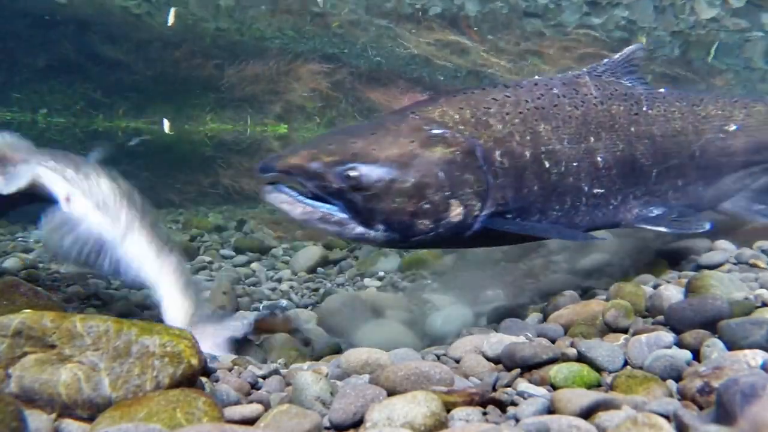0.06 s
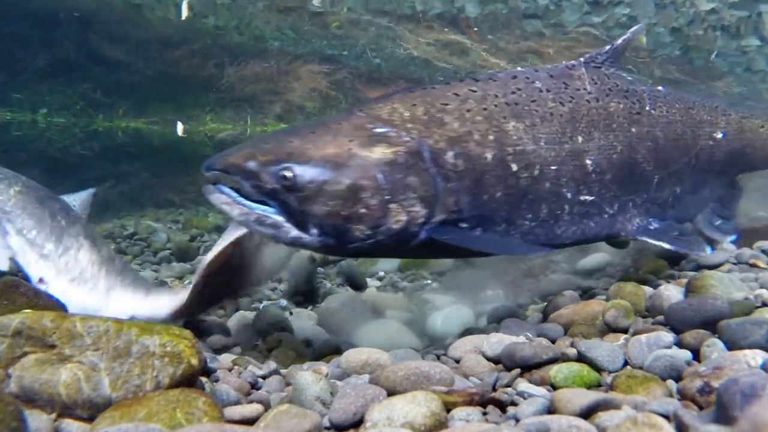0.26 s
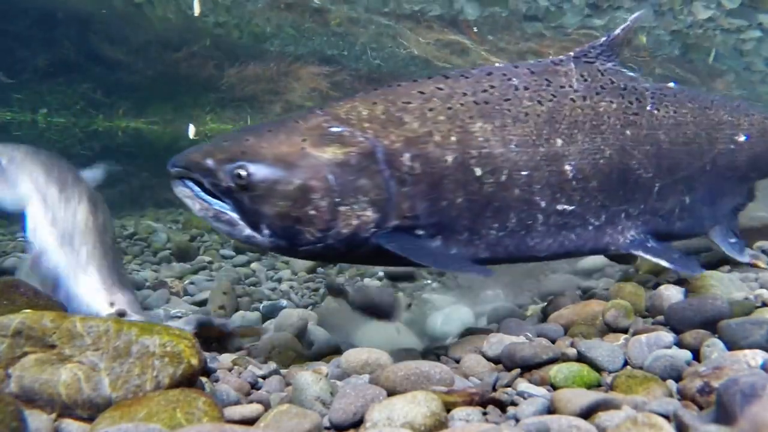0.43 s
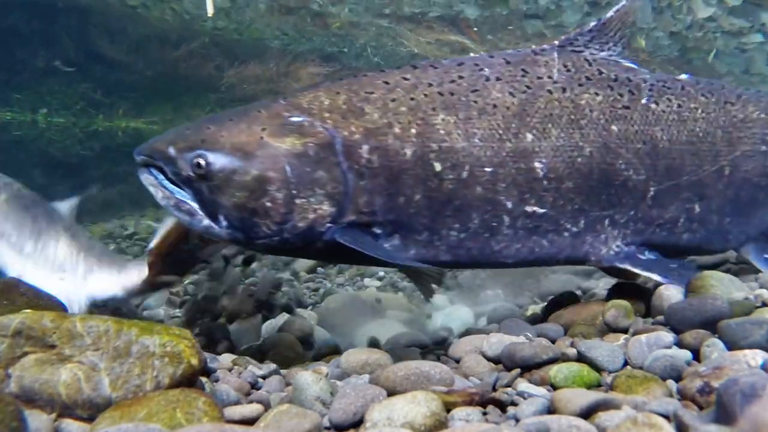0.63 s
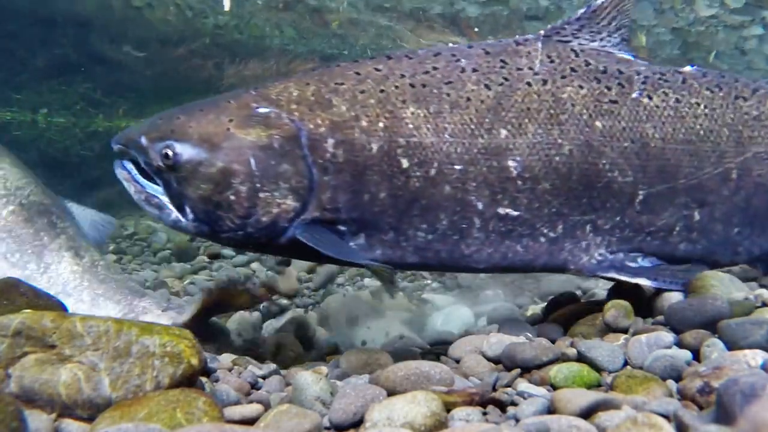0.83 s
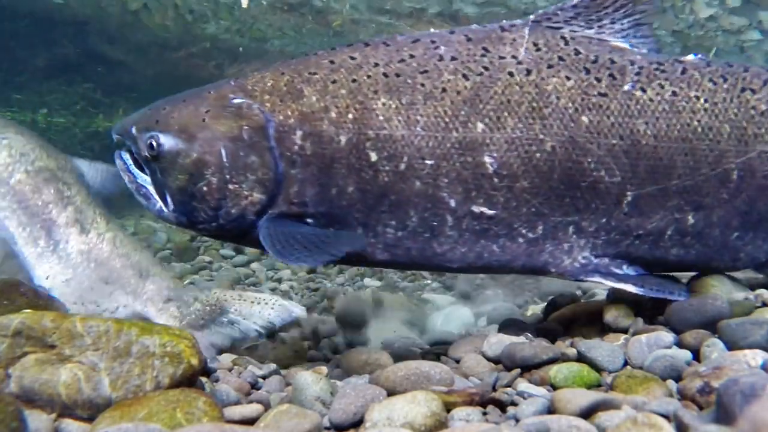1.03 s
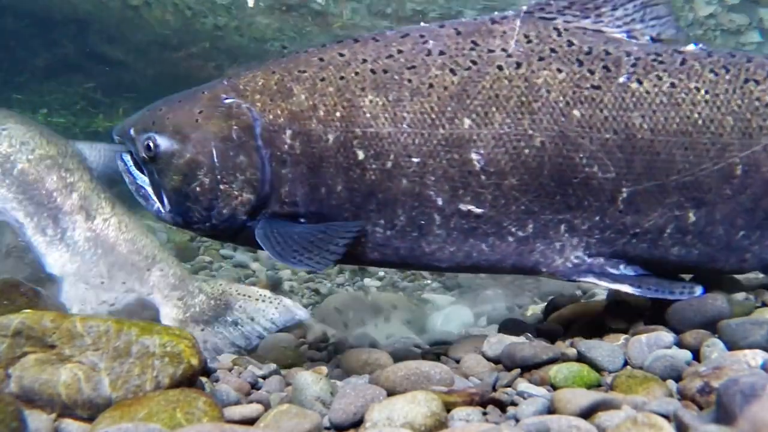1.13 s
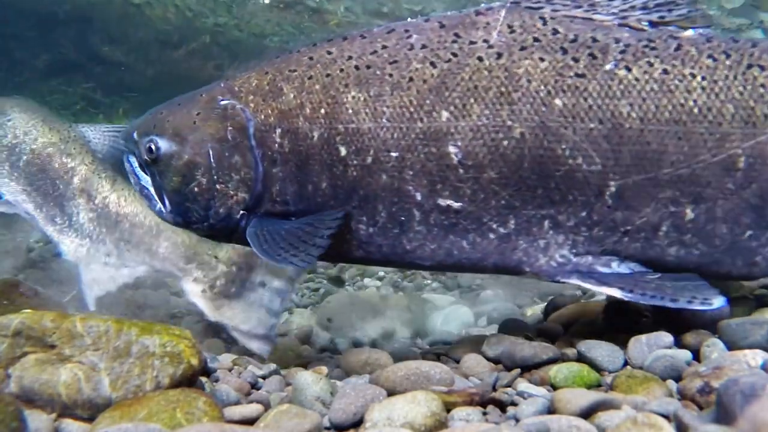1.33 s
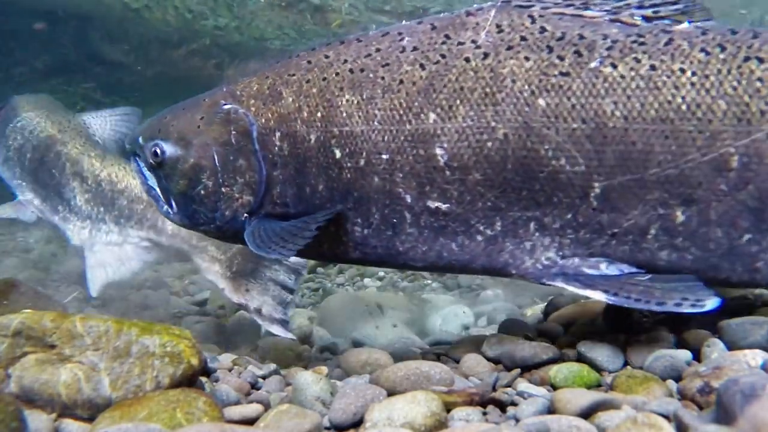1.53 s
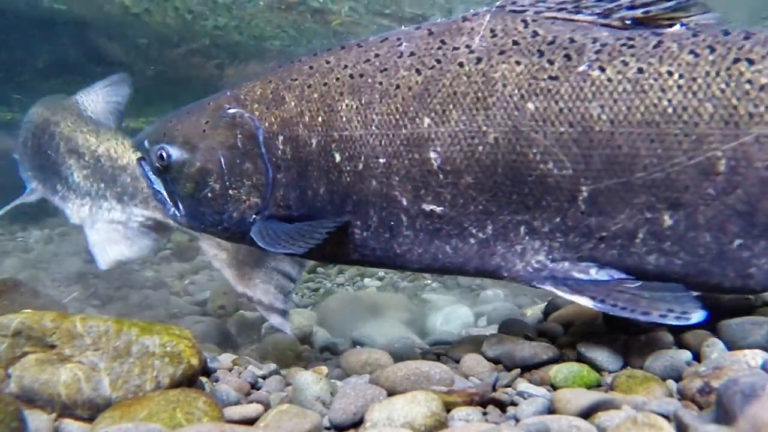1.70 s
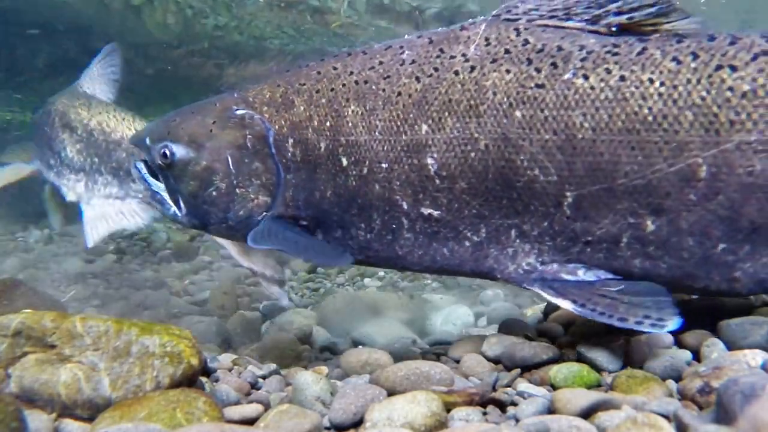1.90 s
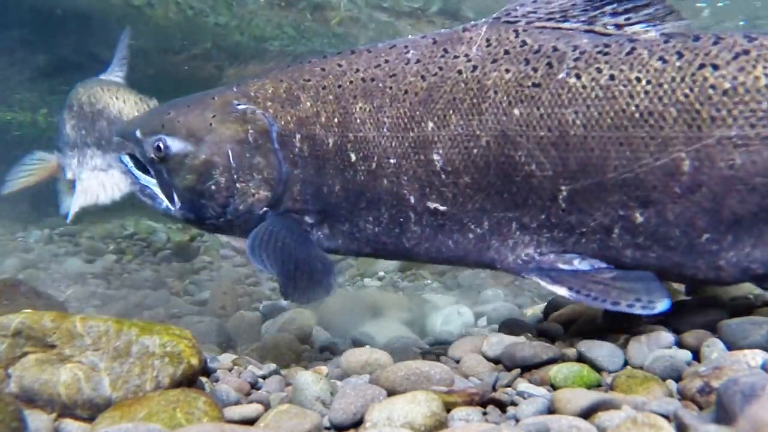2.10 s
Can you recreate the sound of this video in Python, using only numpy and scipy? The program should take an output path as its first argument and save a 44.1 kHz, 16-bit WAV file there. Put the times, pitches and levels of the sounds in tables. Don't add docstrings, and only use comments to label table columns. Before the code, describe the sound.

Stones knock and rattle on a riverbed underwater as a fish beats its tail

```python
import sys
import numpy as np
from scipy import signal
from scipy.fft import rfft, irfft, next_fast_len
from scipy.io import wavfile
from scipy.ndimage import uniform_filter1d, map_coordinates

SR = 44100
rng = np.random.default_rng(int(sys.argv[2]) if len(sys.argv) > 2 else 0)


def output_pcm(signal):
    pcm = np.clip(np.atleast_2d(signal).T, -1, 1) * 32767
    wavfile.write(sys.argv[1], SR, np.round(pcm).astype(np.int16))


def makeup_ratio(level_db):
    decades = np.asarray(level_db, float) / 20
    return 10 ** decades


N = 94815
CHATTER_HZ = 860


def unit(x):
    return x / np.sqrt(np.mean(x ** 2) + 1e-20)


def curve(rows):
    s, *columns = np.transpose(rows)
    return [np.interp(np.arange(N) / SR, s, column) for column in columns]


def wobble(rate):
    knots = rng.standard_normal(400)
    return map_coordinates(knots, [np.arange(N) * rate / SR])


def filtered(x, response):
    m = next_fast_len(N + 8192)
    return irfft(rfft(x, m) * response(np.fft.rfftfreq(m, 1 / SR)), m)[:N]


def noise(spectrum):
    f, db = np.transpose(spectrum)

    def colour(hz):
        return makeup_ratio(np.interp(np.log(hz + 1), np.log(f + 1), db))

    return unit(filtered(rng.standard_normal(N), colour))


def water():
    # (time [s], level [dB])
    shove = [(0, -52.5), (.15, -39.5), (.27, -42.5), (.45, -39), (.55, -43), (.65, -31), (.78, -41.5),
             (.88, -42), (1.1, -40.5), (1.3, -41), (1.55, -47.5), (2.15, -51.5)]
    # (frequency [Hz], density [dB per Hz])
    rumble_spectrum = [(12, -46), (22, -7), (60, 4), (100, 5), (240, -14), (450, -17.5), (880, -120)]
    # (frequency [Hz], density [dB per Hz])
    hiss_spectrum = [(88, -31), (150, 2), (450, -1.5), (1180, -7), (2580, -9.5), (4470, -16),
                     (14500, -24.5), (16300, -38)]
    rumble = unit(noise(rumble_spectrum) * makeup_ratio(1.4 * wobble(8.76)))
    hiss_db = -50.5 + 1.8 * wobble(5.83)
    hiss = noise(hiss_spectrum) * makeup_ratio(hiss_db)
    return makeup_ratio(curve(shove)[0] - 0.07) * rumble + hiss


def housing(f):
    # (centre [Hz], width [Hz], level [dB])
    resonances = [(567, 210, -11.5), (1031, 94, -8), (1648, 287, -4), (1894, 307, 0.5), (2514, 760, 3),
                  (4056, 610, -2), (4933, 536, 0), (6400, 510, 1), (7056, 320, 2), (9670, 1740, -8),
                  (11600, 2400, -11.5), (13900, 2500, -12)]
    leak_db, leak_hz = -14.5, 297
    rings = 0
    for k, (centre, width, db) in enumerate(resonances):
        damping = 1j * f * width
        rings = rings + (-1) ** k * makeup_ratio(db) * damping / (centre * centre - f * f + damping)
    return rings + makeup_ratio(leak_db) / (1 + 1j * f / leak_hz)


def hardness(f, bright_db, body_db):
    knee_hz, bright_octaves, body_hz = 2680, 1.9, 2110
    high = np.clip(np.log2(f / knee_hz + 1e-9) / bright_octaves, 0, 2)
    low = np.clip(np.log2(body_hz / (f + 1)), 0, 1) * np.clip(f / CHATTER_HZ, 0, 1)
    return makeup_ratio(bright_db * high + body_db * low)


def causal(gain):
    c = irfft(np.log(gain))
    half = c.shape[1] // 2
    return np.exp(rfft(np.hstack([c[:, :1], 2 * c[:, 1:half], 0 * c[:, half:]])))


def contacts(s, level_db, bright_db, body_db):
    length, lead = 2048, 256
    blow_t60_s, attack_s = 0.0029, 0.00014
    bed_db, bed_t60_s = -13.5, 0.027
    swell_db, swell_t60_s = -22, 0.0046
    impact_db, impact_hz, impact_lag = 11, 5900, 12
    rough_per_db = 0.07
    own_colour_db = 2

    t = (np.arange(length) - lead) / SR
    f = np.fft.rfftfreq(length, 1 / SR)
    after = np.maximum(t, 0)
    decay = makeup_ratio(-60 * after / blow_t60_s) + makeup_ratio(bed_db - 60 * after / bed_t60_s)
    swell = makeup_ratio(swell_db - 60 * abs(t) / swell_t60_s)
    shape = decay * (1 - np.exp(-after / attack_s)) + swell

    roughness = makeup_ratio(rough_per_db * np.clip(bright_db, -30, 5))[:, None]
    chatter = rfft(rng.standard_normal((len(s), length)) * shape * roughness)
    chatter = chatter * 1j * f / (CHATTER_HZ + 1j * f)
    delay = np.exp(-2j * np.pi * f * (lead + impact_lag) / SR)
    impact = makeup_ratio(impact_db) * delay / (1 + 1j * f / impact_hz) ** 2

    tint = rng.standard_normal((len(s), len(f)))
    own_db = own_colour_db * unit(uniform_filter1d(tint, size=36, axis=1))
    stone = causal(hardness(f, bright_db[:, None], body_db[:, None]) * makeup_ratio(own_db))
    heard = irfft((chatter + impact) * stone * housing(f), length)
    power = np.mean(heard[:, lead:][:, :64] ** 2, axis=1)
    heard *= (makeup_ratio(level_db) / np.sqrt(2 * power))[:, None]
    where = np.round(s * SR).astype(int)[:, None] + np.arange(length)
    return np.bincount(where.ravel(), heard.ravel(), N + length)[lead:][:N]


def grit():
    # (time [s], grit level [dB], fineness [dB])
    stir = [(0, -49.5, -18), (.12, -49.5, -30), (.14, -42, -9.5), (.3, -43.5, -0.5), (.42, -38, -1),
            (.53, -44.5, -9), (.6, -31, -5), (.72, -34.5, -1), (.8, -37, -3.5), (.99, -40, 4),
            (1.08, -42.5, -21), (1.14, -42.5, 8), (1.22, -40.5, -16), (1.45, -43, 4), (1.6, -51.5, 1),
            (1.67, -43, 3), (1.8, -55, 3), (2.15, -57.5, 12)]
    clicks_per_s, click_db, spread_db = 600, 3, 6.5
    click_bright_db, varies_db = 1, 9
    sand_db, sand_patchy_db, sand_bright_db = -8.5, 4, 5.5

    stir_db, fine_db = curve(stir)
    gap, size, hard = rng.random((3000, 3)).T
    s = np.cumsum(-np.log(1 - gap)) / clicks_per_s
    keep = s < N / SR
    s = s[keep]
    level_db = click_db + spread_db * (np.minimum(-np.log(1 - size[keep]), 2.2) - 1)
    bright_db = click_bright_db + varies_db * (2 * hard[keep] - 1)
    bright_db = bright_db + fine_db[(s * SR).astype(int)]
    clicks = contacts(s, level_db, bright_db, 0 * bright_db)

    fizz = rng.standard_normal(N) * makeup_ratio(sand_patchy_db * wobble(90))
    sand = unit(filtered(fizz, lambda f: housing(f) * hardness(f, sand_bright_db, 0)))
    return makeup_ratio(stir_db) * (clicks + makeup_ratio(sand_db) * sand)


def stones():
    # (time [s], level [dB], brightness [dB], body [dB])
    stone_knocks = [(0.0781,-17,5,-9),(0.0943,-19.5,-1,1),(.1336,-25,8,15),(.1895,-19.5,-35,0),(0.2036,-23.5,-34,8),(0.2112,-11.5,-41,-2.5),(.249,-21.5,21,-5),(.2611,-23,-31,-2.5),(0.272,-27,5,6),(0.3293,-27,10,0),(0.3453,-6.5,-64,3.5),(0.3703,-14,-4,-1),(0.3739,-1.5,-24.5,-12),(.4056,-6,-7,-8),(0.4241,-17,-25,0),(0.4442,-12,-13,-2),(.4528,-9,-29,-5),(.4544,-14.5,-23,-16),(0.4689,-18.5,-30,0.5),(0.5792,-10.5,-13,1),(0.59,-15.5,3,5.5),(0.609,1,1,6),(0.6213,-9.5,10,0),(0.6336,-17,9,14),(.6594,-16.5,-4,7),
                    (0.6622,-20,-18,3),(.6675,-1.5,0,-1),(.682,-11.5,3,10),(0.6952,-14,4,3),(0.7062,-5.5,10.5,-3),(.7098,-5.5,13.5,3),(0.7583,-23,4,-4),(0.7707,-10,2,3),(0.7799,-19,22,6),(0.8315,-20,13,15),(0.8608,-16.5,6,6),(0.901,-24.5,8,4),(0.9138,-9,6,5.5),(.955,-5.5,-0.5,-3),(0.9584,-13,7,2),(0.9647,-16.5,1,1),(0.9827,-12.5,9,-1),(1.008,-9.5,6.5,-5),(1.0107,-9,2,0),(1.0157,-11.5,9,0),(1.0296,-9.5,4,3),(1.0371,-9,3,1),(1.042,-15,0,-12),(1.0606,-14.5,7,-2),(1.074,-13,3,4),
                    (1.0803,-1,-3.5,1.5),(1.1001,-11,-7.5,10.5),(1.1196,-15,12,6),(1.1673,-18.5,5,-2),(1.1864,-23,8,4),(1.1934,-17,-4,8),(1.2015,-8,-16,-0.5),(1.2066,-16.5,4,5),(1.2174,-20,14,3),(1.222,-16.5,23,4),(1.2351,-6,-5.5,2.5),(1.2623,-19,6,11),(1.2885,-18.5,3,8),(1.2948,-20,18,2),(1.3264,-10,-8,1),(1.3502,-17.5,14,4),(1.3741,-14,-9,0.5),(1.3872,-21,5,9),(1.4011,-16.5,-9,1),(1.4224,-11.5,3.5,0.5),(1.4361,-12,7,-3),(1.4415,-33,-3,0),(1.449,-15.5,-2,6),(1.465,-21.5,3,-4),(1.48,-17,-1,-5),
                    (1.4882,-15,7,4),(1.5051,-22,12,0),(1.536,-20,10,6),(1.5539,-20,7,0),(1.573,-18.5,6.5,-6),(1.5945,-20,13,-3),(1.5981,-16,6,-5),(1.6313,-21,13,-3),(1.6417,-8.5,-3.5,-7.5),(1.65,-28,5,-2),(1.6895,-15,6.5,4),(1.7243,-30,20,-2),(1.7366,-28.5,21,2),(1.7641,-20.5,10,8),(1.7798,-23.5,5,-2),(1.8357,-25,17,-7),(1.8515,-30,0,-5),(1.879,-29.5,-7,3),(1.899,-24.5,7.5,-6),(1.9112,-27.5,6,-8),(1.9409,-22.5,9,-4),(1.9912,-27,13.5,-1),(2.0227,-28.5,22,-2),(2.0433,-30.5,-3,3),(2.06,-28,27,0),
                    (0.0287,-36,10,0),(0.1648,-41,16,0),(0.2988,-22,-29,11.5),(0.4,-20,-18,6),(0.4137,-17.5,-2,9),(0.4879,-28,-16,11),(0.52,-29,15,-2),(0.5405,-36,12,-2),(0.5538,-28,8,-3),(0.5751,-19,2,3),(.647,-22,17,9),(0.7132,-16.5,10,0),(0.7157,-18,-5,4),(0.731,-25,2,3),(0.8253,-23.5,-5,8),(.85,-21.5,8,-4),(0.889,-25,16,-6),(0.945,-23.5,1,7),(1.023,-27,8,0),(1.109,-22,4,4),(1.1152,-17,-4,2),(1.135,-29,5,0),(1.15,-25,15,0),(1.1622,-22,5,0),(1.6765,-22.5,10,5),(1.799,-35,8,-8),(1.92,-27,4,-2),(2.1007,-43,-4,-0.5),(2.1215,-32.5,6,1),(2.127,-34,12,-6)]
    knocks = np.array(stone_knocks)
    s, level_db, bright_db, body_db = knocks.T
    return contacts(s, level_db - 2.5, bright_db, body_db)


def bubbles():
    # (time [s], pitch [Hz], level [dB], decay T60 [s], onset [s])
    pockets = [(1.193, 1860, -13, 0.018, 0.00082), (1.202, 1656, -28, 0.088, 0.0024),
               (1.285, 515, -19, 0.025, 0.00088), (1.271, 659, -19, 0.27, 0.0087),
               (1.275, 1320, -33, 0.058, 0.0013), (1.284, 706, -15, 0.1, 0.0063),
               (1.325, 624, -21, 0.16, 0.0017), (1.338, 1270, -27, 0.04, 0.0018),
               (1.372, 609, -21.5, 0.1, 0.0026), (1.375, 826, -32, 0.093, 0.004),
               (1.398, 860, -32.5, 0.14, 0.0079), (1.408, 625, -33, 0.11, 0.0018),
               (1.482, 623, -23, .19, 0.0017), (1.482, 1592, -16, 0.062, 0.0022),
               (1.482, 1645, -21, 0.056, 0.0022)]
    rise_per_s, waver, flutter_db = 0.31, 0.0098, 2
    out = np.zeros(N)
    for s, hz, db, t60, onset in pockets:
        t = np.maximum(np.arange(N) / SR - s, 0)
        pitch = hz * (1 + rise_per_s * t + waver * wobble(40.1)) * (t > 0)
        phase = 2 * np.pi * np.cumsum(pitch) / SR
        level = makeup_ratio(db - 60 * t / t60 + flutter_db * wobble(69.88))
        out += level * (1 - np.exp(-t / onset)) * np.sin(phase)
    return out


def scene():
    return (water() + grit() + stones() + bubbles())[None]


def roll_off(x):
    return signal.sosfilt(signal.butter(12, 16510, fs=SR, output="sos"), x)


def record(dry):
    top_hz, top_db_per_khz = 15200, 30

    def band_limit(hz):
        return makeup_ratio(-top_db_per_khz * np.maximum(hz - top_hz, 0) / 1000)

    x = filtered(np.clip(dry[0], -1, 1), band_limit)
    mix = np.clip(x, -1, 1)[None]
    return roll_off(mix)


dry = scene()
out = record(dry)
output_pcm(out)
```